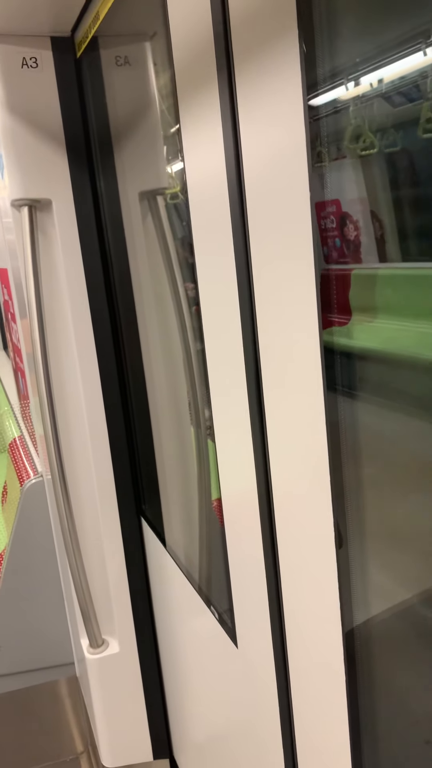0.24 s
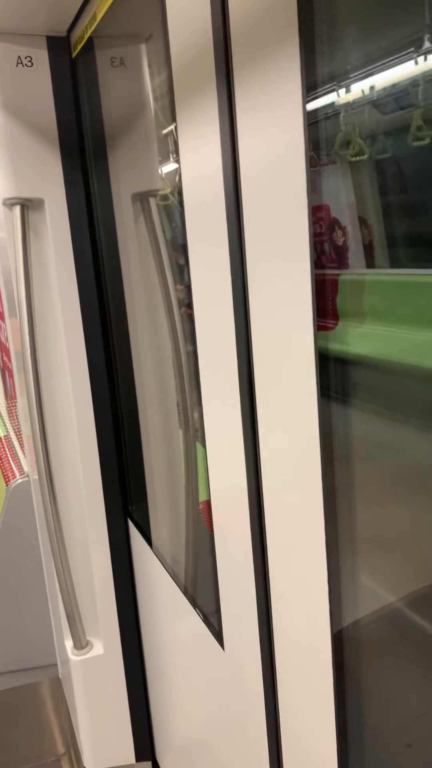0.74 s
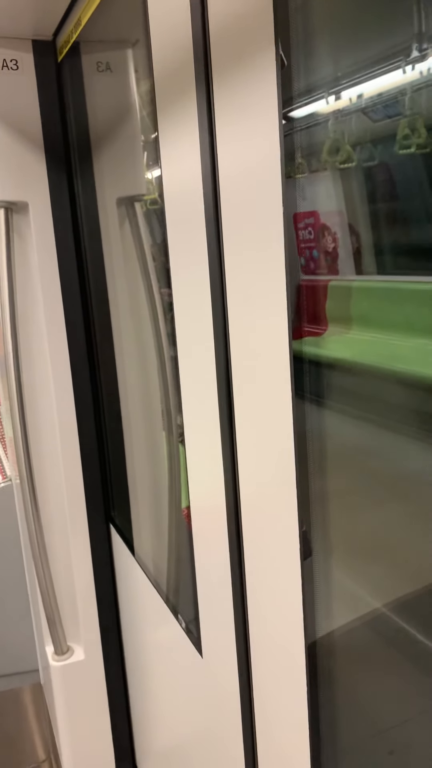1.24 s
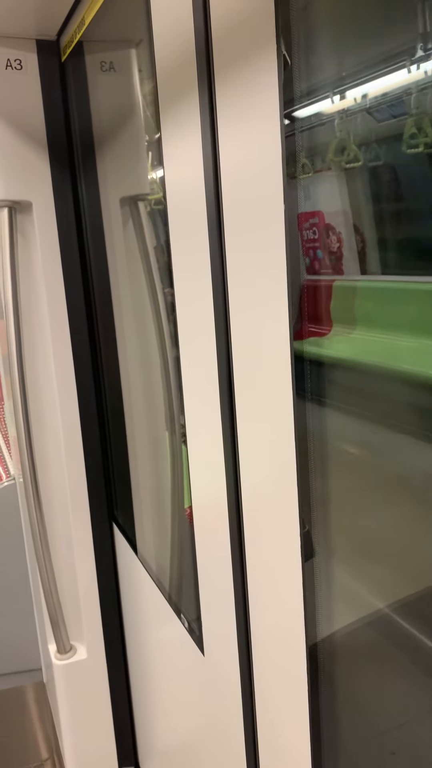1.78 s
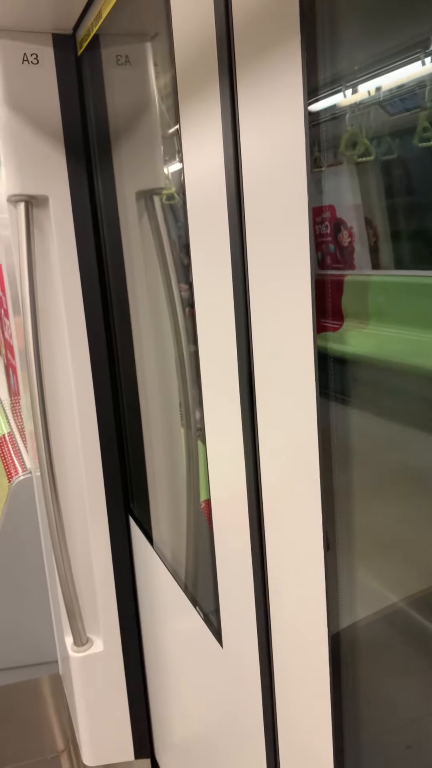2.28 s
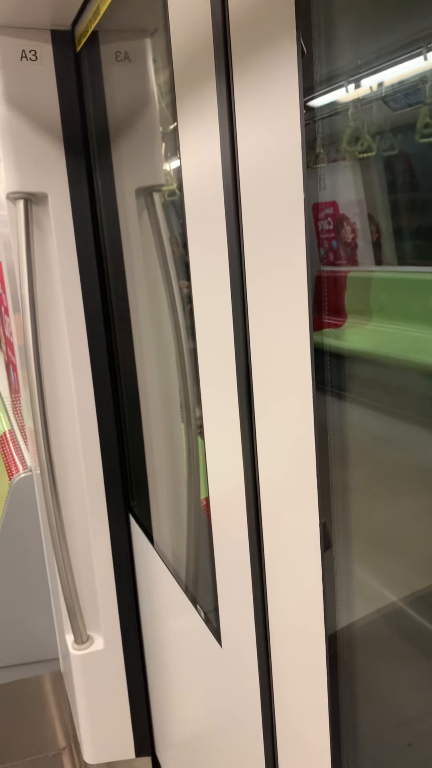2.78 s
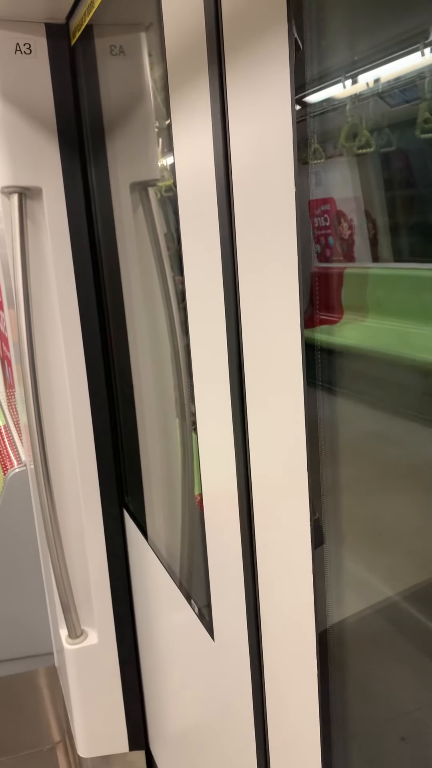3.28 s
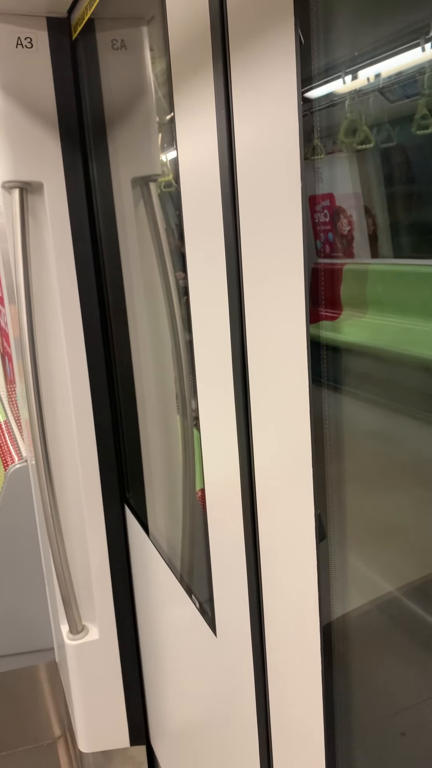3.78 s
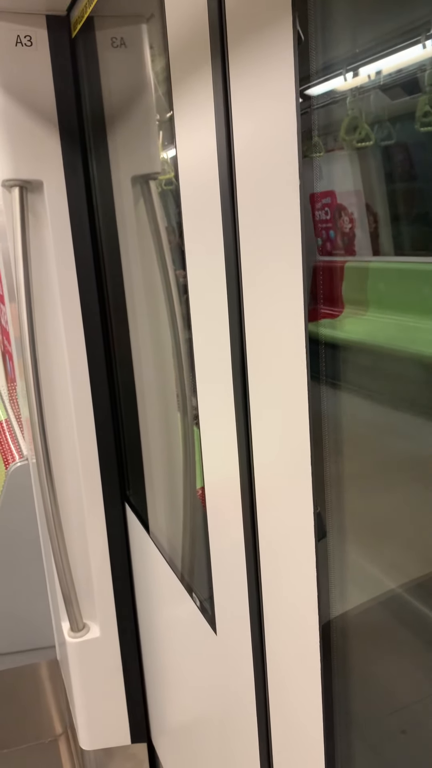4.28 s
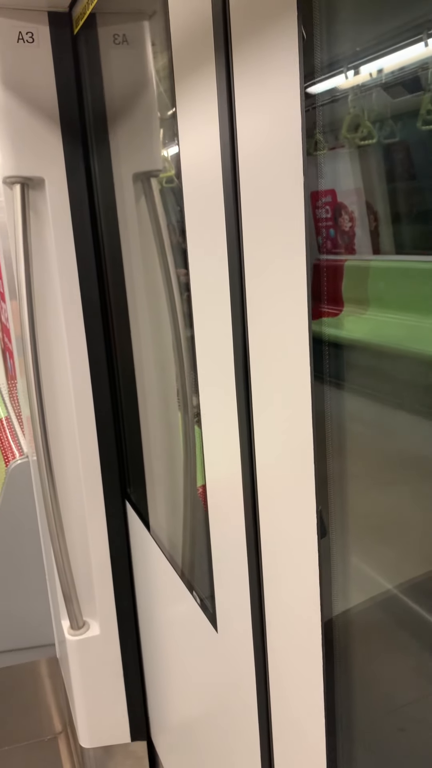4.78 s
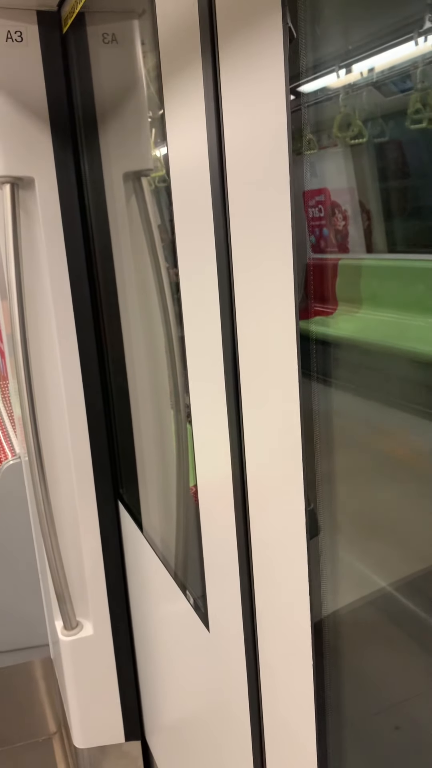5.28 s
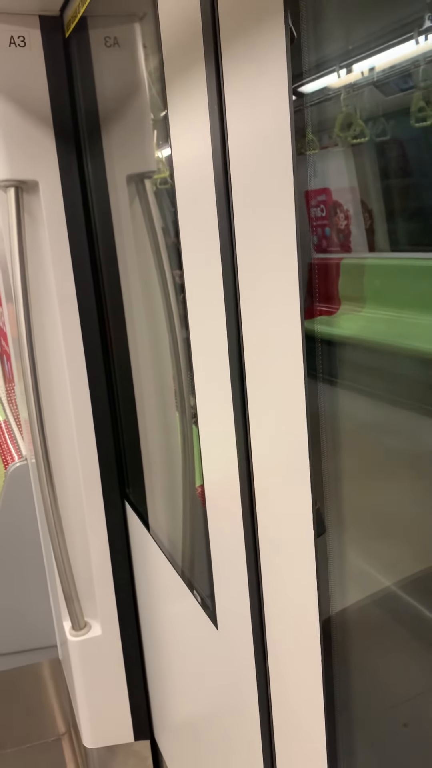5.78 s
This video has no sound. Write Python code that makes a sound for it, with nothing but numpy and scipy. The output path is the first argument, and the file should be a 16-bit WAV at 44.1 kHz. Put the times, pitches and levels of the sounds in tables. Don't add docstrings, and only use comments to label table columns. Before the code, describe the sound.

Inside a metro car in a tunnel, a rolling roar swells with howling wheel tones and airy hiss, then sinks under a thin squeal.

```python
import sys
import numpy as np
from scipy import signal
from scipy.fft import rfft, irfft, next_fast_len
from scipy.io import wavfile
from scipy.ndimage import uniform_filter1d, minimum_filter1d

SR = 44100
rng = np.random.default_rng(int(sys.argv[2]) if len(sys.argv) > 2 else 0)


def master(y):
    cut = np.clip(np.atleast_2d(y).T, -1, 1)
    pcm = np.round(cut * 32767)
    wavfile.write(sys.argv[1], SR, pcm.astype(np.int16))


def nominal_scale(level):
    x = np.asarray(level, float) / 20
    return 10 ** x


N = 265911

# hz, density_db [dB per Hz]
ROLLING_SPECTRUM = [(150, -29.5), (198, -25.5), (240, -17), (300, -10), (370, -7), (440, -12), (620, -9.5),
                    (800, -16), (1080, -26.5), (1290, -21.5), (1680, -34), (2220, -32.5), (3270, -43.5)]


def clock():
    return np.arange(N) / SR


def unit(x):
    return x / np.sqrt(np.mean(x ** 2))


def curve(table):
    time_s, level_db = np.transpose(table)
    return np.interp(clock(), time_s, level_db)


def walk(rate):
    hold = int(SR / rate)
    steps = np.repeat(rng.standard_normal(N // hold + 1), hold)
    slewed = uniform_filter1d(uniform_filter1d(steps, hold), hold)
    return unit(slewed[:N])


def rough(rate, depth_db):
    return unit(nominal_scale(depth_db * walk(rate)))


def noise(gain):
    size = next_fast_len(N)
    hz = np.maximum(np.arange(size // 2 + 1) * SR / size, 1)
    spectrum = rfft(rng.standard_normal(size)) * gain(hz)
    return unit(irfft(spectrum, size)[:N])


def colour(points, low_hz, top_hz, steep=6):
    at_hz, density_db = np.transpose(points)

    def gain(hz):
        edges = (1 + (low_hz / hz) ** (2 * steep)) * (1 + (hz / top_hz) ** (2 * steep))
        return nominal_scale(np.interp(np.log(hz), np.log(at_hz), density_db)) / np.sqrt(edges)
    return gain


def mode(mode_hz, width_hz):
    return lambda hz: 1 / np.hypot(1, 2 * (hz - mode_hz) / width_hz) ** 1.38


def sing(hz, wander_hz, rate):
    cycles = np.cumsum(hz + wander_hz * walk(rate)) / SR
    return np.sqrt(2) * np.sin(2 * np.pi * cycles + 2 * np.pi * rng.random())


def swells(rows, height, rise=1., lag_s=0.):
    coarse_s = clock()[::64]
    total = 0
    for middle_s, half_s, level_db in rows:
        x = (coarse_s - middle_s - lag_s) / half_s
        total = total + height(level_db) * np.exp(-2 * np.where(x < 0, x / rise, x) ** 2)
    return np.interp(clock(), coarse_s, total)


def spells(rows, idle_db):
    return np.sqrt(nominal_scale(idle_db) ** 2 + swells(rows, lambda db: nominal_scale(db) ** 2))


def follow(path):
    # start_s, level_db
    roughness = [(0, -32), (.25, -30), (.55, -25), (.8, -22.5), (1.0, -22.5), (1.38, -24), (1.48, -19),
                 (1.72, -20), (2.05, -18.5), (2.35, -17), (2.6, -18.5), (2.8, -17.5), (3.4, -18.5),
                 (4.2, -18.5), (4.45, -20.5), (4.85, -18), (5.3, -23), (6.03, -29)]
    level_db, db_per_db, drift_db_per_s = path
    mean_db, middle_s = -19, 3
    return level_db + db_per_db * (curve(roughness) - mean_db) + drift_db_per_s * (clock() - middle_s)


def body():
    # hz, density_db [dB per Hz]
    rumble_spectrum = [(8.8, -37.5), (15, -9), (38, 2.5), (81, -3.5), (155, -0.5), (190, 0), (250, -27.5),
                       (420, -120)]
    # middle_s, half_length_s, level_db
    jolts = [(.24, .14, -35), (1.0, .14, -36), (1.4, .08, -34), (1.92, .18, -38), (2.3, .08, -37),
             (2.8, .08, -34.5), (3.05, 0.098, -33), (3.44, .06, -35), (3.85, 0.15, -38), (4.84, .14, -35),
             (5.9, .15, -40.5)]
    steady = nominal_scale(-36) * noise(colour(rumble_spectrum, 51, 190))
    steady += nominal_scale(-45) * noise(colour(rumble_spectrum, 12, 30))
    bounce = sing(39, wander_hz=2.5, rate=8.5) + nominal_scale(-5.0) * sing(49, wander_hz=3.5, rate=7.2)
    return steady + nominal_scale(-1.5) * spells(jolts, idle_db=-44.5) * bounce


def fan():
    return nominal_scale(-56.5) * noise(mode(2900, 160))


def wheel_hum():
    # middle_s, half_length_s, level_db
    hums = [
        (.95, 0.14, -23.5),
        (1.3, 0.085, -23.5),
        (3.45, .1, -13),
        (4.0, 0.082, -17.5),
        (4.35, .15, -16.5),
        (4.62, 0.058, -20),
    ]
    return spells(hums, idle_db=-46) * rough(24, depth_db=1.5) * sing(352, wander_hz=3.97, rate=12)


def seal():
    # hz, density_db [dB per Hz]
    hiss_spectrum = [(2000, -7.5), (2800, -4), (3280, -6), (3980, -10), (4940, -12.5), (5460, -10.5),
                     (7500, -16.5), (9600, -18.5), (11000, -24), (13500, -38.5), (15600, -44.5)]
    # middle_s, half_length_s, level_db
    puffs = [(.66, 0.22, 5.5), (1.1, 0.11, 1.5), (1.47, 0.14, 7), (1.83, .1, 3.5), (2.25, .15, 1.5),
             (2.73, .1, 0), (3.06, .1, 0), (3.45, .1, -0.5), (3.83, 0.09, 2), (4.198, 0.087, 1),
             (4.72, .12, 1.5), (5.08, 0.056, 3)]
    # start_s, level_db
    pressure = [(0, -7.5), (.2, -9), (.58, -7), (1.0, -4.5), (1.38, -5), (1.75, -1.5), (2.6, 0), (3.5, 1.5),
                (4.3, -.5), (5.05, -1.5), (5.35, -5.5), (6.03, -7)]

    def puff_db(lag_s):
        return swells(puffs, lambda db: db, rise=.3, lag_s=lag_s)
    air_db = curve(pressure)
    late_puff_db = puff_db(.05)
    clatter_db = follow((-30, 0.87, 0)) + .5 * walk(9)
    leak_db = follow((-34, 1.07, -.1)) + .35 * late_puff_db + .5 * walk(15)
    hiss_db = -45 + 0.92 * air_db + 0.99 * late_puff_db + 0.41 * walk(16)
    edge_db = -53 + air_db + puff_db(0) + .35 * walk(16)
    leak = noise(colour(ROLLING_SPECTRUM, 1650, 2940)) + nominal_scale(-14.5) * noise(mode(2170, 30))
    out = nominal_scale(clatter_db) * noise(colour(ROLLING_SPECTRUM, 1044, 1880))
    out += nominal_scale(leak_db) * leak
    out += nominal_scale(hiss_db) * noise(colour(hiss_spectrum, 3000, 7000, steep=3.3))
    return out + nominal_scale(edge_db) * noise(colour(hiss_spectrum, 7000, 17000, steep=3.5))


def squeal():
    # middle_s, half_length_s, level_db
    rubs = [
        (4.38, .06, -63),
        (4.66, .06, -60),
        (4.83, .05, -58),
        (5.05, .05, -63),
        (5.3, .1, -54.5),
        (5.5, .07, -60),
        (5.71, .075, -54),
        (5.99, .07, -54.5),
    ]
    pitch_hz = 5406 + 40 * np.interp(clock(), [4.2, 5.2], [1, 0])
    idle_db = np.interp(clock(), [0, 5.18, 5.26], [-85, -67, -61.5])
    line = rough(60, 1.7) * sing(pitch_hz, wander_hz=6.5, rate=70)
    skirt = nominal_scale(-11) * noise(mode(5440, 110)) + nominal_scale(-11) * noise(mode(5270, 40))
    return nominal_scale(1.5) * spells(rubs, idle_db) * (line + skirt)


def rail():
    modes_hz = [574.5, 599.6, 627.5, 683.0]
    # middle_s, half_length_s, level_db
    mode_spells = [
        [(1.12, 0.061, -17), (1.5, 0.24, -22.5), (2.92, 0.09, -28), (4.25, 0.13, -19.5), (5.2, 0.3, -17.5),
         (5.6, .14, -17)],
        [(.84, 0.061, -16.5), (1.7, 0.3, -16.5), (2.84, .1, -13.5), (3.12, 0.15, -11.5), (3.73, 0.037, -14),
         (4.25, .08, -12.5), (5.35, 0.32, -16)],
        [(.8, 0.11, -20.5), (1.4, 0.37, -20), (2.2, 0.16, -13.5), (3.0, .15, -22.5), (3.55, 0.18, -15.5),
         (4.68, 0.037, -14.5), (5.02, 0.05, -16)],
        [(.75, 0.16, -20.5), (1.48, 0.11, -18), (1.93, 0.06, -16.5), (2.35, 0.22, -23), (3.14, .06, -14),
         (4.0, 0.22, -24.5), (2.62, .12, -18.5)],
    ]
    out = 0
    for hz, rows in zip(modes_hz, mode_spells):
        idle_db = follow((-25, .8, 0)) + 3 * walk(8)
        out = out + nominal_scale(-3.5) * spells(rows, idle_db) * rough(20, 1.76) * sing(hz, wander_hz=1.325, rate=7)
    return out


def wheels():
    modes_hz = [227.5, 259.7, 308.5, 380.2]
    # level_db, slope [dB per dB of roughness], drift [dB per s]
    idles = [(-33, 0.57, 1.5), (-42, 0.87, 0.95), (-30.5, 0.52, 3.3), (-29, 0.29, -1.8)]
    # middle_s, half_length_s, level_db
    mode_spells = [
        [(3.4, 0.41, -23), (4.28, 0.082, -21), (4.52, 0.086, -20), (4.76, 0.086, -24), (5.6, 0.088, -35)],
        [(1.68, .22, -16.5), (2.36, 0.18, -17), (1.98, .1, -21), (2.8, 0.25, -22.5), (3.45, 0.2, -18.5),
         (4.03, 0.15, -16), (4.75, 0.11, -20.5)],
        [(1.2, 0.083, -25), (1.78, 0.16, -19.5), (2.25, 0.074, -15), (3.0, 0.073, -16.5), (3.45, 0.11, -20),
         (4.08, 0.068, -19), (4.4, 0.072, -19.5), (4.95, 0.27, -19.5), (5.6, .1, -19.5), (6.0, 0.26, -20)],
        [(.45, 0.18, -27), (1.52, 0.075, -18), (2.1, 0.33, -18.5), (2.85, 0.49, -9.5), (3.3, .2, -17.5),
         (3.97, 0.061, -21), (4.28, 0.31, -16), (5.1, 0.08, -14)],
    ]
    wanders_hz = [2.1, 1.1, 4.5, 1.1]
    out = 0
    for hz, wander_hz, rows, idle in zip(modes_hz, wanders_hz, mode_spells, idles):
        gain = spells(rows, follow(idle) + 2.45 * walk(9))
        out = out + gain * rough(24, depth_db=0.54) * sing(hz, wander_hz, rate=12)
    return out


def rolling():
    # pitch_hz, width_hz, level_db [dB re its band]
    rung_modes = [(289.8, 3, -15.5), (358.3, 5.4, -14), (373.3, 9.6, -14), (403, 2.8, -18), (427, 7.7, -23),
                  (442.6, 2.6, -22), (476.7, 1.6, -22), (521.5, 1.8, -17), (551.6, 9.2, -25),
                  (650.7, 3.3, -11), (699.6, 3.3, -16.5), (746.6, 8.5, -14.5), (771, 4.5, -21.5),
                  (829.4, 16, -22), (898, 51, -22.5)]
    boom_db = follow((-13, 0.6, 0.4)) + 1.2 * walk(10)
    drone_db = follow((-22, 0.43, 1.4)) + 1.2 * walk(10)
    roar_db = follow((-16.5, 0.98, -.3)) + 1.2 * walk(10)
    upper_db = follow((-19.5, 0.85, 0)) + 1.2 * walk(10)
    out = nominal_scale(boom_db - 5.0) * noise(colour(ROLLING_SPECTRUM, 130, 394))
    out += nominal_scale(drone_db + 1.0) * noise(colour(ROLLING_SPECTRUM, 402, 578))
    out += nominal_scale(roar_db - 2.5) * noise(colour(ROLLING_SPECTRUM, 534, 722, steep=16))
    out += nominal_scale(upper_db - 1.6) * noise(colour(ROLLING_SPECTRUM, 698, 1050, steep=7.7))
    bands_db = [boom_db, drone_db + 7, roar_db + 2, upper_db + 4]
    for mode_hz, width_hz, mode_db in rung_modes:
        band_db = bands_db[np.searchsorted([415, 530, 670], mode_hz)]
        out += nominal_scale(band_db + mode_db) * noise(mode(mode_hz, width_hz))
    return out


def scene():
    background = body() + fan() + wheel_hum() + seal()
    return (background + squeal() + rail() + wheels() + rolling())[None]


def top_cut(x):
    return signal.sosfilt(signal.butter(12, 15720, fs=SR, output="sos"), x)


def record(dry):
    limit_level, limit_ratio, limit_s, overload_level = .95, .04, .004, .985
    heard = dry + nominal_scale(-71) * rng.standard_normal(N)
    span = int(limit_s * SR)
    gain = np.minimum(limit_level / (np.abs(heard) + 1e-9), 1) ** limit_ratio
    gain = uniform_filter1d(minimum_filter1d(gain, span), span)
    edge_s = np.minimum(np.arange(N), np.arange(N)[::-1]) / SR
    soft_ends = np.sin(np.pi / 2 * np.minimum(edge_s / .0015, 1)) ** 2
    mix = np.clip(heard * gain, -overload_level, overload_level) * soft_ends
    return top_cut(mix)


dry = scene()
out = record(dry)
master(out)
```